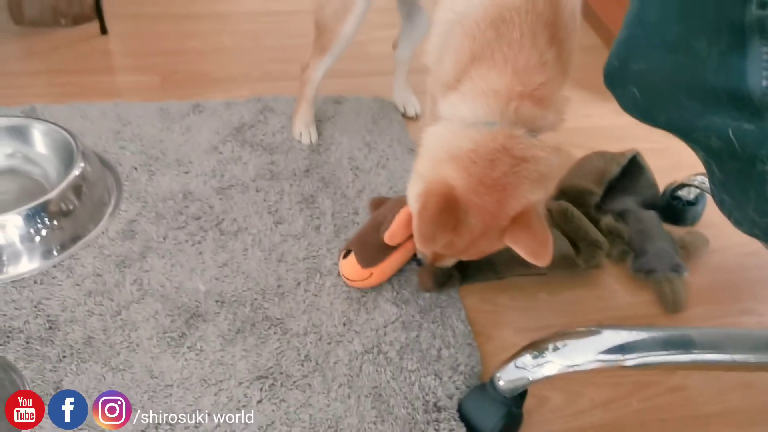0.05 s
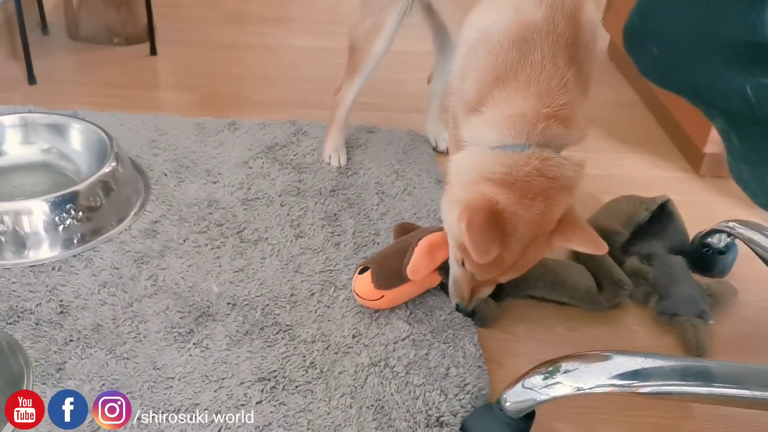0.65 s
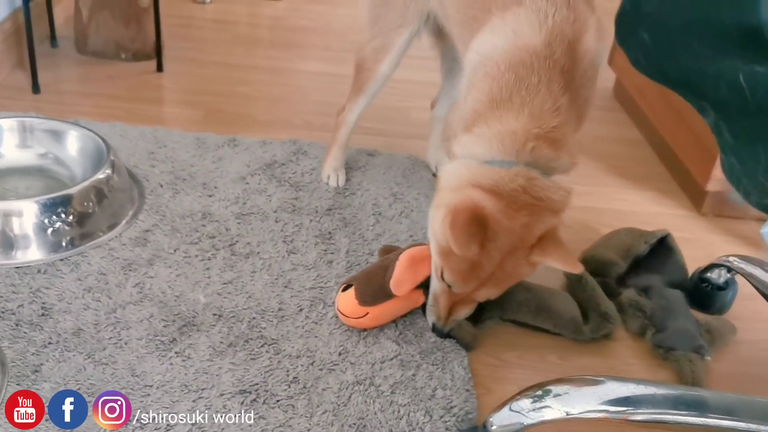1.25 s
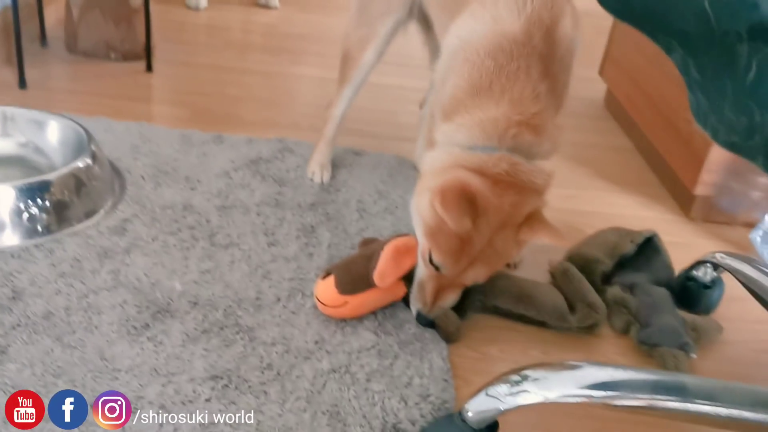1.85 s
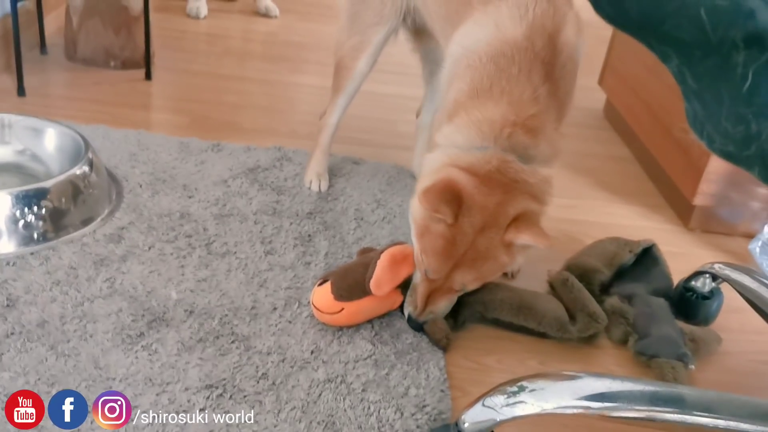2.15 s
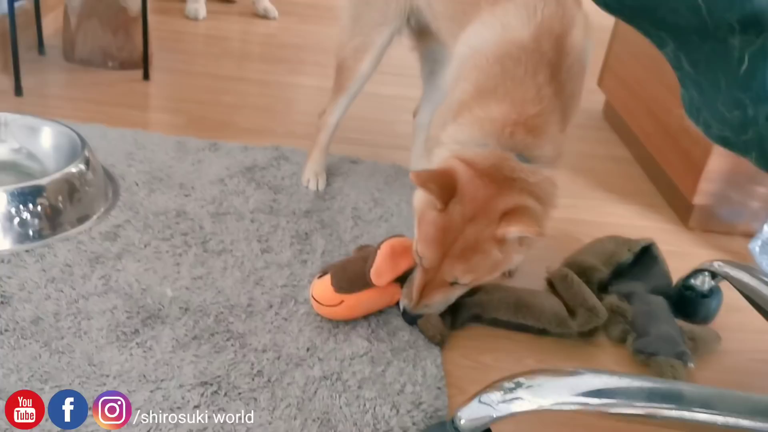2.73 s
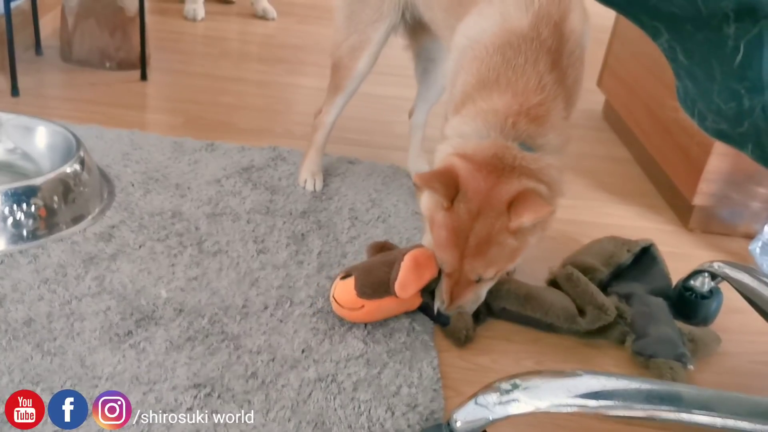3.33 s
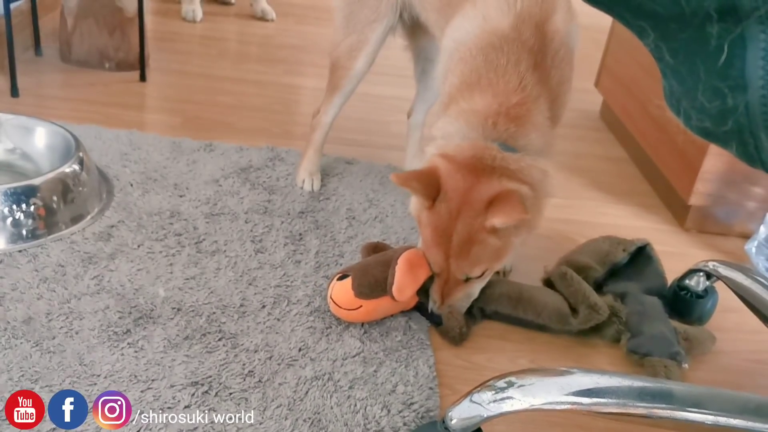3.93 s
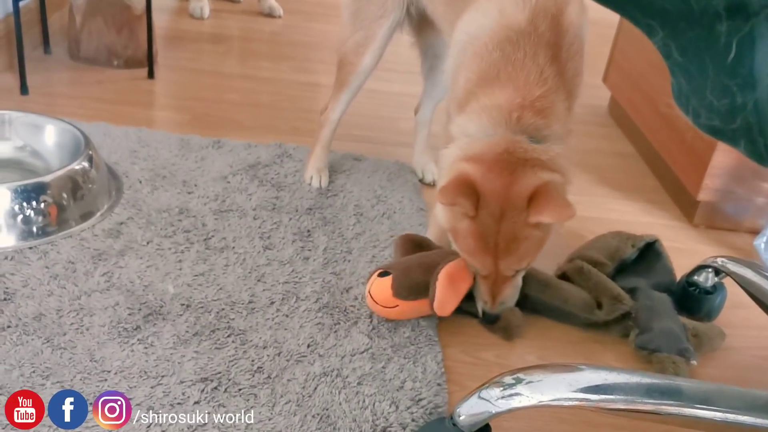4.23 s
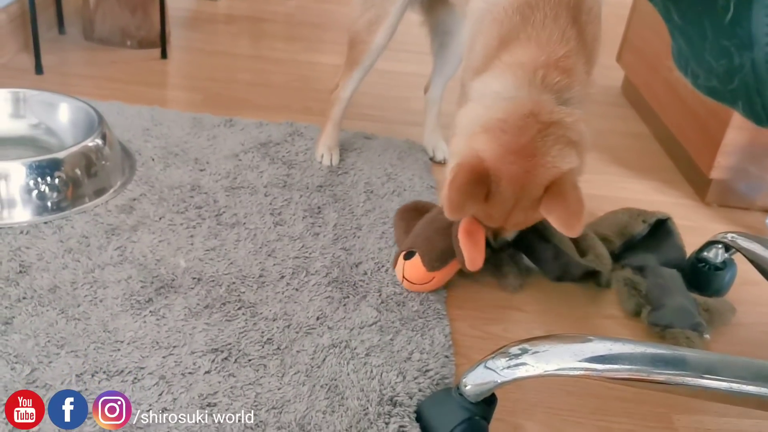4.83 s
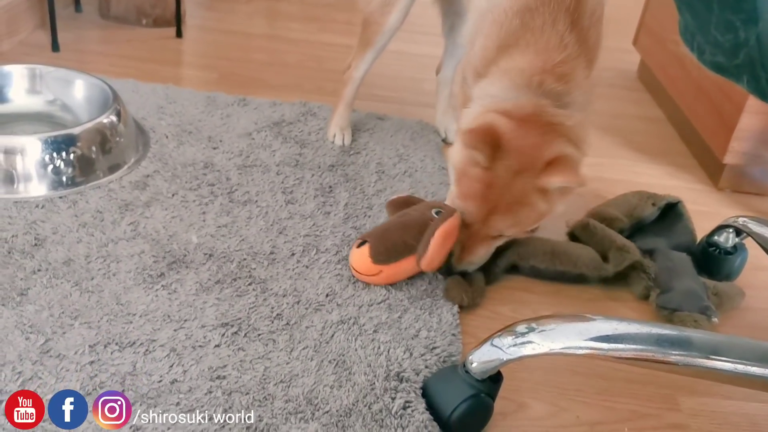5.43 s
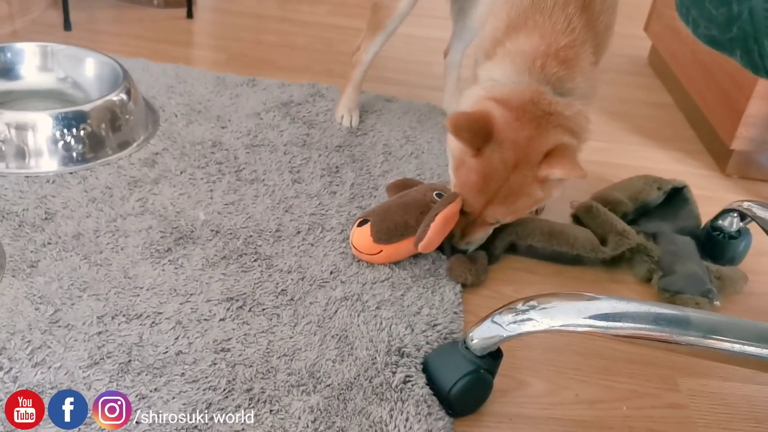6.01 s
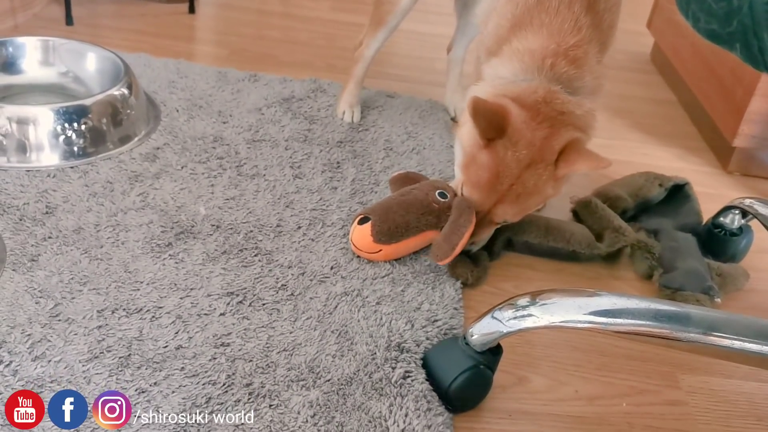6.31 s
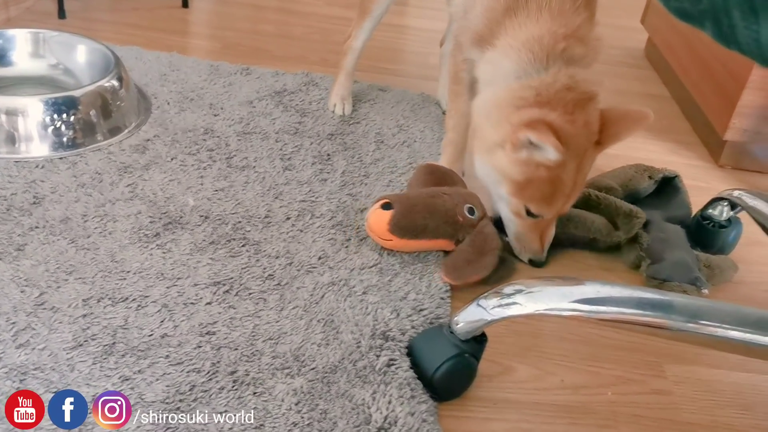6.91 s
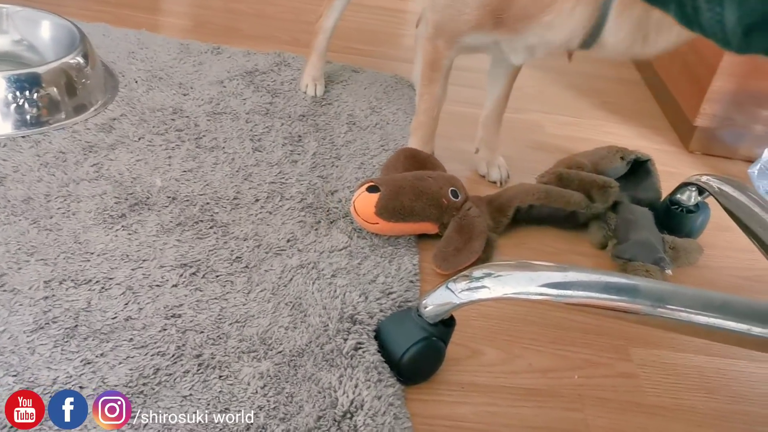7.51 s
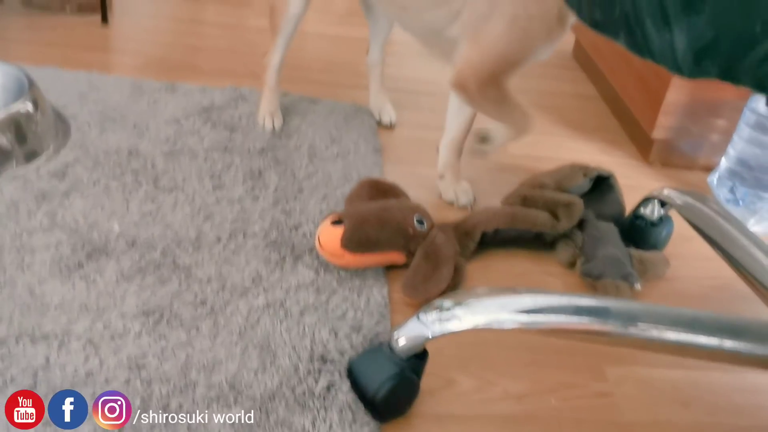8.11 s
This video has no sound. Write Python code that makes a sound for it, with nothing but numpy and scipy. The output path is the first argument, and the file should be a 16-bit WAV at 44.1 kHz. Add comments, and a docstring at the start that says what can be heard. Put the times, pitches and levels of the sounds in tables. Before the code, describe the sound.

A dog mouths and tugs a plush toy on the floor of a quiet room, heard from close by. The fabric rustles and its lining crinkles in short scratchy bouts, with sharp little snaps and a few soft knocks on the floor. After a brief lull the tugging resumes, then ends with a faint metal clink and light paw steps. A low rumble and soft hiss lie underneath.

```python
"""A dog mouths and tugs a plush toy at the edge of a rug in a furnished room.
From the start a low rumble swells and fades under a soft hiss; one dry tick sounds far to the right.
Then come short bouts of pulling: the cloth rubs by stick-slip friction, its lining crinkles, and folds
buckle between the teeth with sharp snaps, while muzzle, toy and paws knock on the floor. After a lull
the tugging resumes. At the end the dog lets go, metal clinks, and it steps away on the wooden floor."""
import sys
import numpy as np
from scipy import signal
from scipy.fft import rfft, irfft
from scipy.io import wavfile

SR = 44100
rng = np.random.default_rng(int(sys.argv[2]) if len(sys.argv) > 2 else 0)


def materialize(psi):
    """Save the field psi as 16-bit PCM at rate SR to the path in sys.argv[1].

    A 1-D psi becomes a single channel; in a 2-D psi each row is a channel.
    """
    bounded = np.clip(np.atleast_2d(psi).T, -1, 1)
    quanta = np.round(bounded * 32767).astype(np.int16)
    wavfile.write(sys.argv[1], SR, quanta)


N = 359856

# the toy's cavity resonance, which moves as the bite shifts: time_s, centre_hz, emphasis_db
HOLLOW_RESONANCE = [(0.68, 1863, 6), (0.9, 2320, 3), (2.27, 2510, 3.5), (2.52, 2080, 3.5), (3.2, 2530, 8.5),
                    (3.4, 2347, 4), (3.9, 2320, 4), (5.8, 2160, 4), (6.18, 2600, 3.5), (6.8, 2300, 5)]
HOLLOW_WIDTH_HZ = 450


def rustle(tug_db, taut_db, creases_per_s=900, slips_per_s=230, rub_db=-7, slip_db=2, split_hz=4800):
    """Stick-slip friction: creases tick over a rub with broad slips; harder tugs set off more of both."""
    pace = from_db((tug_db - tug_db.max()) / 2)
    size = np.sqrt(pace.mean() / pace)  # sparser clicks are larger, so tug_db governs the level
    # gentle nibbling gives separate slips; in a hard pull they merge into the rub
    slips = from_db(slip_db) * size * grains(slips_per_s * np.sqrt(pace), spread_db=2.0)[0]
    rub = from_db(rub_db) * rng.standard_normal(N)
    friction = scatter(slips + rub, decay_s=.0006, level_db=0)
    cloth = friction + size * creases(creases_per_s * pace)
    cloth = cloth * from_db(1.5 * drift(56))  # the crinkling comes in clumps
    # spectrum of the crinkling toy: frequency_hz, gain_db
    toy_spectrum = [(300, -19), (700, -5.5), (1450, -6.5), (2300, -2), (3300, -6), (4700, -2.5),
                    (8000, -5.5), (10900, -1), (13000, -8), (15200, -7.5)]
    cloth = colour(pockets(cloth), toy_spectrum)
    hollow_hz, hollow_db = in_time(HOLLOW_RESONANCE)
    resonance = sweep(cloth, hollow_hz, HOLLOW_WIDTH_HZ)
    cloth = rms_one(cloth + (from_db(hollow_db) - 1) * resonance)
    # taut cloth is bright, slack cloth is dull
    mids = signal.sosfilt(signal.butter(1, split_hz, fs=SR, output="sos"), cloth)
    treble = cloth - mids
    return from_db(tug_db) * (mids * from_db(-taut_db / 2) + treble * from_db(taut_db / 2))


def tugging(tighten_db_per_s=480, slacken_db_per_s=250, slack_treble_db=-1.5):
    """Incoherent sources add in power: pulls and grip sum to the rustle's level and tautness in dB."""
    # the dog bites down and pulls (tautness is treble over mids): start_s, hold_s, level_db, taut_db
    pulls = [(0.19, 0.06, -59.5, 1.5), (0.68, 0.075, -51, -3), (0.868, 0.025, -43, -2),
             (1.059, 0.045, -53.0, -2), (1.161, 0.02, -48.0, -1.5), (1.4, 0.05, -50, -5.5),
             (1.526, 0.024, -46.5, -8), (1.652, 0.03, -50, -4), (1.925, 0.125, -49.5, 1),
             (2.172, 0.055, -48, -6.5), (2.29, 0.06, -50, -10), (2.42, 0.13, -49.5, -7),
             (2.62, 0.064, -50.5, -3), (2.9, 0.05, -45.5, 1.5), (3.025, 0.035, -48.5, -1),
             (3.111, 0.055, -52, 2), (3.317, 0.025, -47, -9), (3.417, 0.01, -47.5, -5),
             (3.622, 0.026, -46.5, -5), (3.801, 0.008, -50.5, -5.5), (3.88, 0.056, -42.5, 2.5),
             (4.071, 0.0149, -50, -4), (4.172, 0.028, -44.5, 1), (4.25, 0.028, -52.0, 2),
             (4.405, 0.035, -50, 6), (4.49, 0.04, -53, 2), (5.541, 0.137, -55.5, 3.5),
             (5.726, 0.0129, -47, -1), (5.796, 0.045, -46, 1), (6.054, 0.015, -50, 3),
             (6.176, 0.0181, -45.5, -1.5), (6.406, 0.12, -52.5, -8.5), (6.54, 0.03, -46.5, -4.5),
             (6.935, 0.082, -41, -4.5)]
    # rustle of the muzzle pressed into the toy between pulls: time_s, level_db
    grip = [(0, -73), (0.6, -66), (1.3, -71), (1.75, -59), (2.78, -66), (3.3, -61), (3.75, -69),
            (4.68, -60.5), (4.9, -75), (5.97, -66), (6.3, -60), (7.15, -56), (7.6, -76)]
    t = np.arange(N) / SR
    power = from_db(in_time(grip)[0]) ** 2
    weighted_taut = slack_treble_db * power
    for start_s, hold_s, level_db, taut_db in pulls:
        near = slice(max(int((start_s - .5) * SR), 0), int((start_s + hold_s + .5) * SR))
        age_s = t[near] - start_s
        loose_db = np.maximum(-tighten_db_per_s * age_s, slacken_db_per_s * (age_s - hold_s))
        pull_power = from_db(level_db - np.maximum(loose_db, 0)) ** 2
        power[near] += pull_power
        weighted_taut[near] += taut_db * pull_power
    return 10 * np.log10(power), weighted_taut / power


def creases(per_s, spread_db=1.0, relative_width=0.52, patchy_db=3.0):
    """Impulse excitation: small creases tick in seven bands, and the favoured pitches keep shifting."""
    out = 0
    for hz in np.geomspace(1100, 12500, num=7):
        ticks = band(grains(per_s, spread_db, stray=1) + 1e-18, hz, relative_width * hz)
        out = out + ticks * from_db(patchy_db * drift(19.0))
    return rms_one(out)


def pockets(x, relative_width=0.14, depth_db=-5.5, shifts_per_s=9):
    """Cavity filtering: gaps between jaws and cloth open and close, so narrow bands swell and sink."""
    centres_hz = np.geomspace(700, 5600, num=12)
    gaps = sum(band(x, hz, relative_width * hz) * drift(shifts_per_s) for hz in centres_hz)
    return x + from_db(depth_db) * gaps


def snaps(crackle_s=0.0098, crackles_per_s=1600, crackle_db=-7, relative_width=2.36, ring_db=-4):
    """Buckling: a fold strains, gives way with one crack, and its neighbours tick one by one after it."""
    # folds that snap between the teeth: time_s, energy_db, centre_hz
    folds = [(0.6932, -26, 2400), (0.8394, -17, 9000), (0.8634, -13.5, 9570), (1.156, -23, 6000),
             (1.4198, -24, 7000), (1.5135, -22.5, 5500), (1.5352, -17, 7000), (1.55, -24, 7500),
             (1.666, -17.5, 6000), (2.045, -19, 5550), (2.0502, -19.5, 8000), (2.1568, -19.5, 5500),
             (2.206, -13, 6900), (2.211, -12.5, 6400), (2.223, -16, 7000), (2.268, -19, 5470),
             (2.302, -20, 4460), (2.3277, -20, 6000), (2.3409, -10.5, 5870), (2.4056, -14, 4480),
             (2.4634, -9, 3000), (2.705, -22, 4450), (2.753, -24, 4730), (2.814, -19.5, 9500),
             (2.875, -19, 7000), (2.8941, -18.5, 5450), (2.9283, -12, 8000), (3.0067, -21.5, 3500),
             (3.031, -13, 4200), (3.1567, -16.5, 5200), (3.2028, -18, 6500), (3.323, -11.5, 3900),
             (3.325, -12.5, 4470), (3.406, -15.5, 6200), (3.4158, -7, 4560), (3.4522, -21, 1420),
             (3.549, -16, 8300), (3.598, -14.5, 5230), (3.6198, -17, 5300), (3.626, -12, 6000),
             (3.649, -31, 3700), (3.865, -23, 2750), (3.885, -14, 7500), (3.9446, -27, 5800),
             (4.147, -20, 10380), (4.194, -11.5, 5000), (4.395, -15, 9300), (4.469, -23, 9600),
             (4.4921, -21.5, 4400), (4.5136, -18.5, 6700), (4.6713, -24, 5000), (5.013, -32, 6000),
             (5.2283, -22, 8550), (5.2997, -30.5, 4000), (5.378, -26.5, 8000), (5.6824, -21.5, 6000),
             (6.067, -21.5, 7550), (6.389, -18, 5900), (6.5439, -15.5, 4140), (6.724, -22.5, 6960),
             (6.9378, -13, 4230), (6.9548, -17.5, 3200), (7.0089, -17.5, 2840), (7.1861, -13, 8500)]
    out = np.zeros((2, N))
    t = np.arange(-SR // 60, SR // 30) / SR
    impulse = t == 0
    envelope = np.exp(-np.maximum(t, -3 * t) / crackle_s)  # rises three times as fast as it falls
    hollow_hz, _ = in_time(HOLLOW_RESONANCE)
    for time_s, energy_db, hz in folds:
        crackle = rng.standard_normal(len(t)) * (rng.random(len(t)) < crackles_per_s / SR) * envelope
        crackle = from_db(crackle_db) * crackle / np.linalg.norm(crackle)
        crack = scatter(impulse + crackle, decay_s=0.0009, level_db=-1)
        width_hz = relative_width * hz
        crack = band(crack, hz, width_hz, order=2) / np.linalg.norm(band(impulse, hz, width_hz, order=2))
        # the toy's hollow rings briefly, at a slightly different pitch for each bite
        ring_hz = hollow_hz[round(time_s * SR)] * np.exp(.05 * rng.standard_normal())
        ring = from_db(ring_db) * band(crack, ring_hz, HOLLOW_WIDTH_HZ)
        add(out, time_s + t[0], from_db(energy_db) * (crack + ring))
    return out


def drag(tug_db, follow=0.19, level_db=-65, lumpy_db=3):
    """Sliding friction: the stuffed body makes a dull rub that grows more gently than the rustle."""
    # spectrum of the body dragging on the floor: frequency_hz, gain_db
    drag_spectrum = [(150, -7), (280, 4.5), (430, -1), (700, -0.5), (2000, -13.5)]
    effort_db = follow * (tug_db - np.median(tug_db)) + lumpy_db * drift(42)
    return from_db(level_db + effort_db) * stereo_noise(drag_spectrum, side_db=-3.5)


def contacts():
    """Damped impacts: each thud or scuff is a band of noise that starts at once and dies away."""
    # muzzle, toy and paws meet the floor: start_s, level_db, centre_hz, width_hz, decay_s
    knocks = [(1.861, -55, 4270, 2600, 0.15), (2.463, -36.5, 695, 1001, 0.0044),
              (2.59, -46, 135, 93, 0.075), (2.985, -51, 136, 70, 0.15), (3.26, -43.5, 70, 59.6, 0.059),
              (3.875, -65, 760, 250, 0.051), (4.164, -47, 685, 280, 0.0075),
              (5.771, -51.5, 4350, 2000, 0.076), (6.17, -54.5, 740, 300, 0.035), (6.77, -61, 760, 304, 0.3),
              (7.076, -40, 2160, 2460, 0.012), (7.305, -40, 4100, 900, 0.0055),
              (7.585, -58, 651, 202, 0.061), (8.034, -60.5, 4300, 1600, 0.054)]
    out = np.zeros((2, N))
    t = np.arange(SR // 2) / SR
    for start_s, level_db, hz, width_hz, decay_s in knocks:
        friction = scatter(rng.standard_normal(len(t)) * np.exp(-t / decay_s) + 1e-18)
        knock = band(friction, hz, width_hz, order=2) * np.sqrt(SR / 2 / width_hz)
        add(out, start_s, from_db(level_db) * knock)
    return out


def clink(start_s=7.306, level_db=-53, t60_s=0.45):
    """Modal ringing: as the dog lets go, the close modes of a small metal piece jingle unevenly and fade."""
    # modes of the metal: pitch_hz
    modes_hz = [3957, 4100, 4150, 4290]
    out = np.zeros((2, N))
    t = np.arange(SR // 2) / SR
    modes = sum(np.sin(2 * np.pi * (hz * t + rng.random((2, 1)))) * drift(33)[:len(t)] for hz in modes_hz)
    add(out, start_s, from_db(level_db - 60 * t / t60_s) * modes)
    return out


def tick():
    """A heavily damped transient: one click of about two cycles, with no room around it."""
    # a dry tick far to the right: start_s, level_before_pan_db, left_minus_right_db
    ticks = [(.5671, -26.7, -34)]
    # spectrum of the tick: frequency_hz, gain_db
    tick_spectrum = [(1400, -23), (3100, -1), (4700, 0), (8000, -31)]
    out = np.zeros((2, N))
    click = colour(signal.unit_impulse(SR // 100), tick_spectrum)
    for start_s, level_db, pan_db in ticks:
        add(out, start_s, from_db(level_db) * pan(pan_db) * click / np.abs(click).max())
    return out


def scatter(x, decay_s=0.0026, level_db=-3):
    """Scattering: floor, chair and the moving dog give every click a new brief tail on each side."""
    pole = np.exp(-1 / (decay_s * SR))
    energy = signal.lfilter([0, 1 - pole], [1, -pole], x ** 2 + 1e-18)
    share = from_db(level_db)
    return (x + share * np.sqrt(energy) * rng.standard_normal((2, len(x)))) / np.hypot(1, share)


def room(x, tail_db=-11, t60_s=0.28):
    """Reverberation: diffuse reflections decay exponentially, differently on each side."""
    t = np.arange(SR // 2) / SR
    tail = rng.standard_normal((2, len(t))) * from_db(-60 * t / t60_s)
    tail = tail / np.linalg.norm(tail, axis=1, keepdims=True)
    return x + from_db(tail_db) * signal.fftconvolve(x, tail, axes=1)[:, :N]


def background(hiss_db=-66, drone_hz=84, drone_width_hz=24, drone_db=-5):
    """Ambient noise: a swelling rumble with a narrow-band drone in it, under a steady soft hiss."""
    # swell of the low rumble: time_s, level_db
    swell = [(0.4, -59.5), (1.7, -54), (3.4, -52.5), (3.8, -56), (6.3, -58.5), (7.1, -54), (8.1, -60)]
    # spectrum of the rumble: frequency_hz, gain_db
    rumble_spectrum = [(22, 12.5), (60, 3), (125, -1), (190, -5.5), (400, -27.5)]
    # spectrum of the quiet room and microphone hiss: frequency_hz, gain_db
    hiss_spectrum = [(250, 6.5), (600, 2.5), (1000, -3.5), (2100, -1.5), (4700, -5), (9000, -51)]
    swell_db, = in_time(swell)
    drone = from_db(drone_db) * rms_one(band(rng.standard_normal(N), drone_hz, drone_width_hz, order=2))
    rumble = from_db(swell_db) * (stereo_noise(rumble_spectrum, side_db=-9) + drone) * pan(2)
    return rumble + from_db(hiss_db) * stereo_noise(hiss_spectrum, side_db=-2.5)


def grains(per_s, spread_db, stray=0):
    """Poisson process: stereo clicks at random moments, uneven in size; each may stray to one side."""
    at = np.flatnonzero(rng.random(N) < per_s / SR)
    sizes = from_db(spread_db * np.minimum(rng.exponential(1, len(at)), 4))
    out = np.zeros((2, N))
    out[:, at] = sizes * rng.choice([-1, 1], len(at)) * (1 + stray * rng.standard_normal((2, len(at))))
    return rms_one(out)


def stereo_noise(spectrum, side_db):
    """Partial coherence: coloured noise with a common and an opposed part, at unit rms."""
    mid, side = rng.standard_normal((2, N))
    return rms_one(colour(mid + from_db(side_db) * side * np.array([[1], [-1]]), spectrum))


def drift(rate_hz):
    """Low-passed noise: a smooth random fluctuation of unit spread."""
    hop, settle = 40, 2000
    pole = np.exp(-2 * np.pi * hop * rate_hz / SR)
    noise = rng.standard_normal(N // hop + settle + 2)
    slow = signal.lfilter([1], [1, -2 * pole, pole * pole], noise)[settle:]
    return np.interp(np.arange(N) / hop, np.arange(len(slow)), rms_one(slow))


def colour(x, spectrum, size=8192):
    """Minimum-phase filtering along a curve of frequency_hz, gain_db."""
    hz, db = np.transpose(spectrum)
    grid_hz = np.maximum(np.fft.rfftfreq(size, 1 / SR), 1)
    gain = from_db(np.interp(np.log(grid_hz), np.log(hz), db))
    cepstrum = irfft(np.log(gain))
    cepstrum[1:size // 2] *= 2  # folding onto positive time makes the response causal
    response = irfft(np.exp(rfft(cepstrum[:size // 2], size)))
    return signal.oaconvolve(x, response.reshape((1,) * (x.ndim - 1) + (-1,)), axes=-1)[..., :N]


def band(x, hz, width_hz, order=1):
    """Resonance: a band-pass around a geometric centre."""
    low_hz = np.hypot(hz, width_hz / 2) - width_hz / 2
    edges_hz = [low_hz, min(low_hz + width_hz, .47 * SR)]
    return signal.sosfilt(signal.butter(order, edges_hz, "band", fs=SR, output="sos"), x)


def sweep(x, hz, width_hz):
    """Heterodyning: shifting down, low-passing and shifting back gives a resonance whose centre moves."""
    carrier = np.exp(2j * np.pi * np.cumsum(hz) / SR)
    baseband = signal.sosfilt(signal.butter(1, width_hz / 2, fs=SR, output="sos"), x / carrier)
    return 2 * np.real(baseband * carrier)


def from_db(db):
    """Decibels to amplitude ratio."""
    return np.exp(np.asarray(db) * (np.log(10) / 20))


def rms_one(x):
    """Normalisation to unit rms."""
    return x / np.sqrt(np.mean(x ** 2) + 1e-20)


def in_time(rows):
    """Linear interpolation of each column of a curve to every sample."""
    time_s, *columns = np.transpose(rows)
    return [np.interp(np.arange(N) / SR, time_s, column) for column in columns]


def pan(db):
    """Left and right gains for a level difference."""
    return from_db(np.array([[.5], [-.5]]) * db)


def add(out, start_s, sound):
    """Superposition of a short sound at a given time."""
    at = round(start_s * SR)
    out[..., at:at + sound.shape[-1]] += sound[..., :N - at]


def scene(rustle_db=1.42):
    """Level and time cues put the toy a little to the right: the left is softer and one sample later."""
    # level difference of the toy between the sides: frequency_hz, left_minus_right_db
    balance = [(300, -3.5), (1300, -6), (2400, -8), (6000, 1), (14000, -4.5)]
    tug_db, taut_db = tugging()
    left, right = room(from_db(rustle_db) * rustle(tug_db, taut_db) + snaps() + drag(tug_db))
    left = colour(np.roll(left, 1), [(hz, db / 2) for hz, db in balance])
    right = colour(right, [(hz, -db / 2) for hz, db in balance])
    return np.array([left, right]) + room(contacts() + clink()) + tick() + background()


def record(dry, cutoff_hz=15900):
    """Band limiting: a steep elliptic low-pass removes the highest treble."""
    return signal.sosfilt(signal.ellip(10, .2, 70, cutoff_hz, fs=SR, output="sos"), dry)


dry = scene()
out = record(dry)
materialize(out)
```